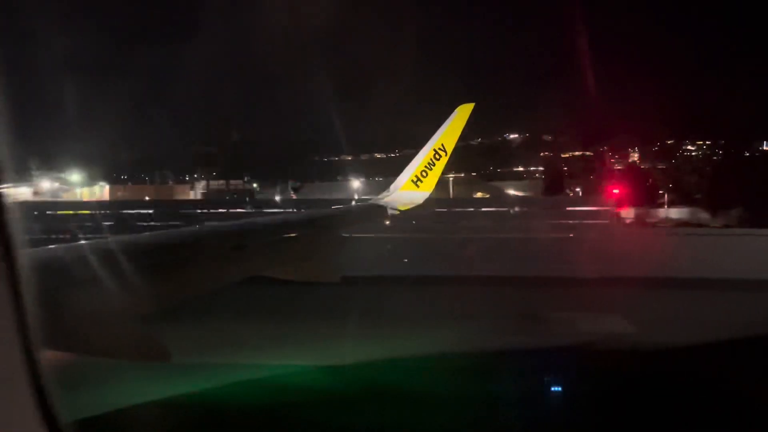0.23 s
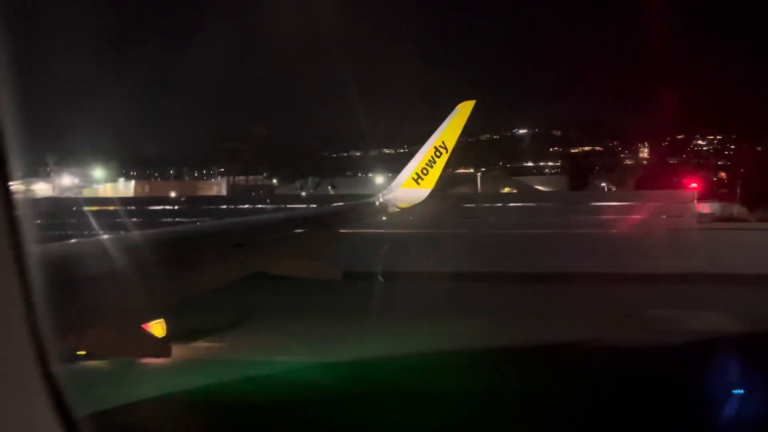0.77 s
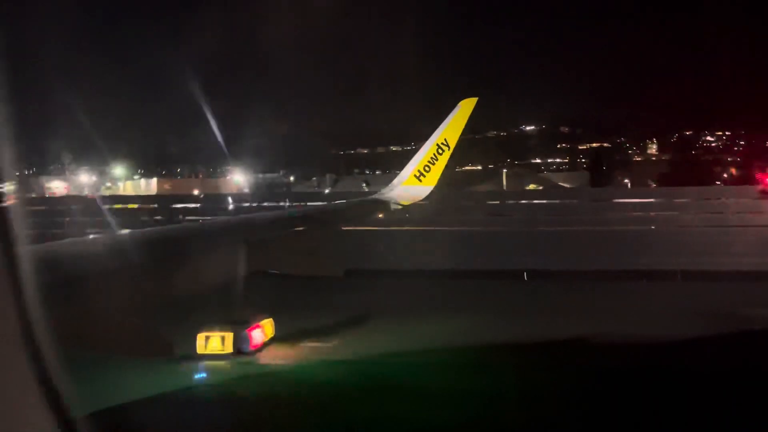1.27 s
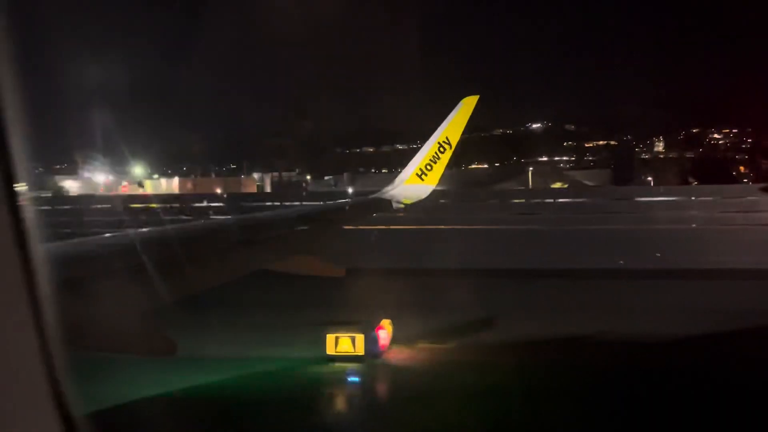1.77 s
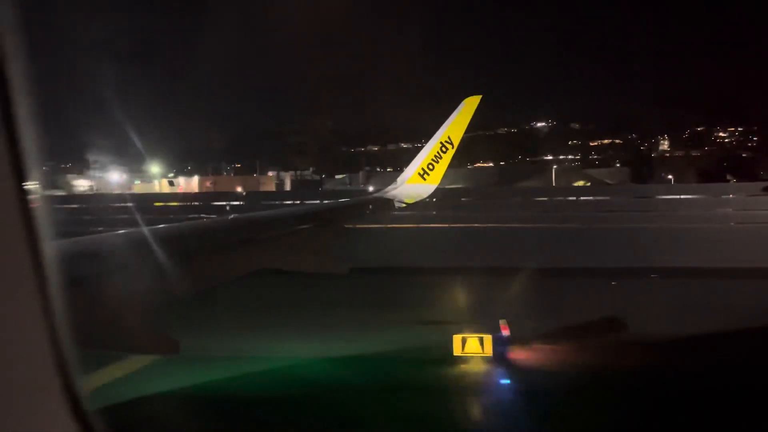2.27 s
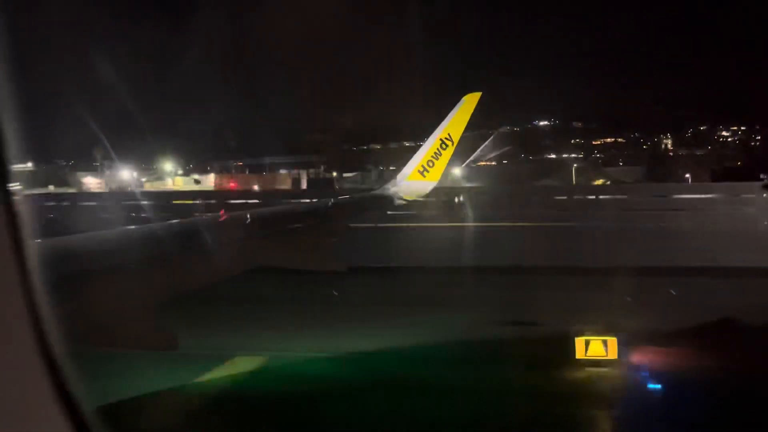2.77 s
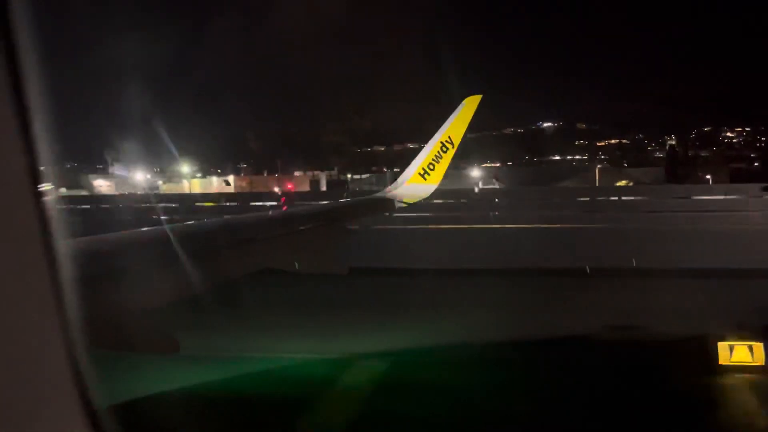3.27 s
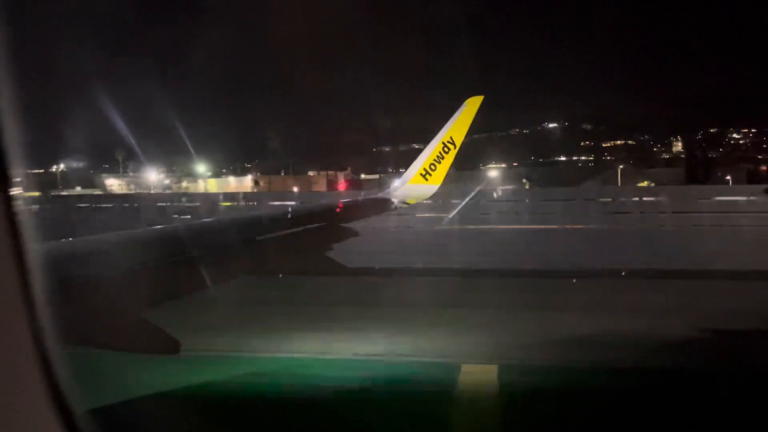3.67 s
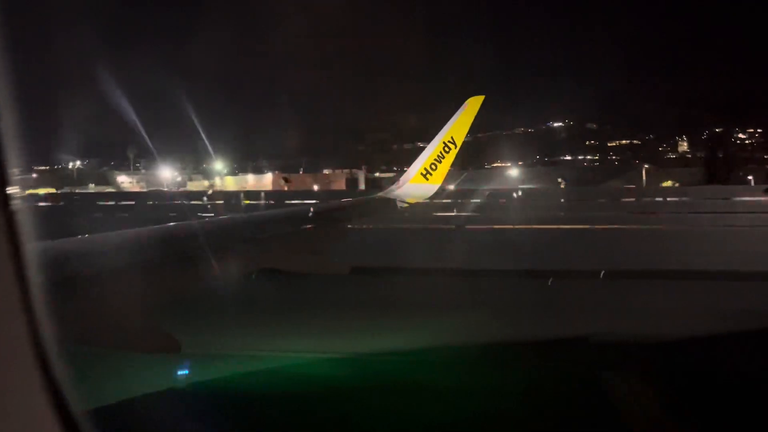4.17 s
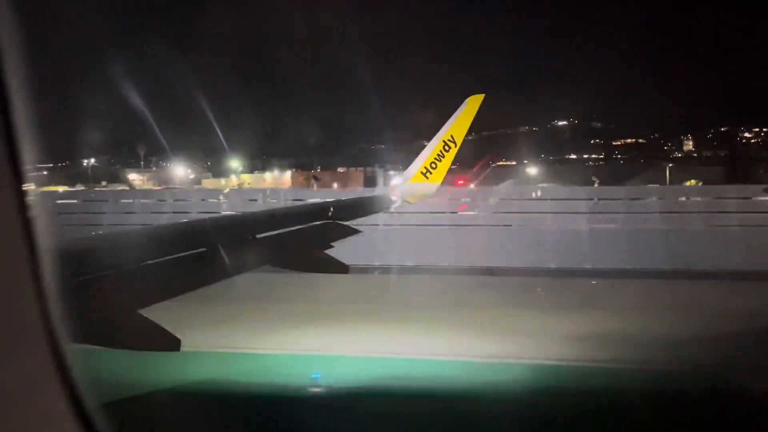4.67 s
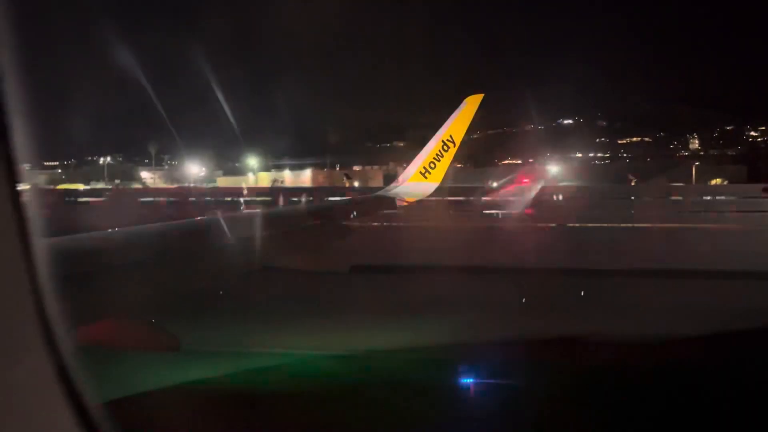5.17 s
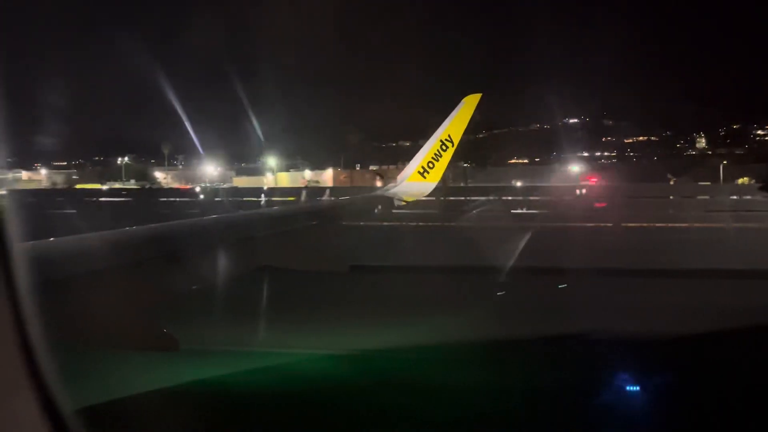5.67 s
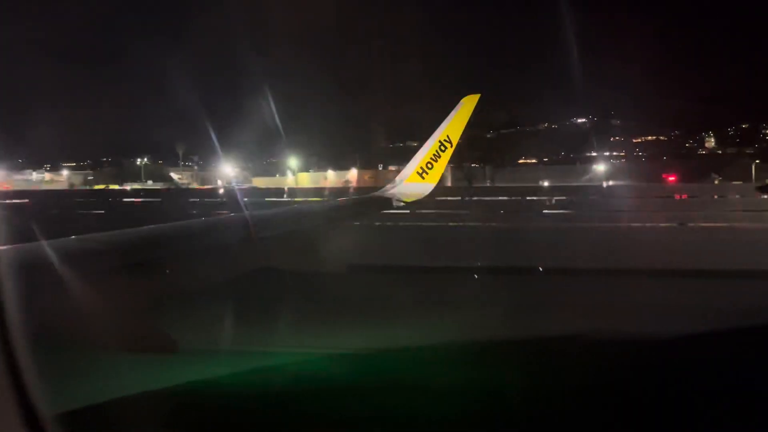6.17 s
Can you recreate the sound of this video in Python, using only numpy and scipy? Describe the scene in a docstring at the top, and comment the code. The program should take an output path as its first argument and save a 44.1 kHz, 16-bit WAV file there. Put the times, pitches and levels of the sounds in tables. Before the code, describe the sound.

For about six and a half seconds we are inside an airliner cabin as it taxis, with a stereo microphone by the window. From 0 s a very deep hull boom surges and drops unevenly as wheels cross slabs, strong at the start, near 0.5 s and 1 s, and heaviest around 1.3-1.7 s; further swells come near 2.7, 3.2, 3.5, 4.6, 5.4 and 5.9 s. A higher, fluttering thrum jolts alongside. Muffled engine roar, low rumble and faint vent hiss stay constant over a steady low hum. Two hydraulic pumps hold a nasal whine, beating about 1.8 times a second. Faint dry trim or cloth rustles begin near 0.5 s, cluster around 1.2-1.5 s, then recur sparsely around 2, 2.75, 3.6, 4.4 and 4.9 s, with a last faint one at 5.4 s. The bed continues to the end without stopping.

```python
"""Inside an airliner cabin while it taxis, a two-port microphone held by the window.
From the start the hull booms and thrums as the wheels roll over uneven slabs: near sines shaken in pitch and level.
Engines and air vents roar and hiss as shaped noise through the walls, with a steady low hum beneath.
Two hydraulic pumps, slightly out of step, whine and beat: harmonics and mixing tones one beat apart.
From half a second on, the trim or cloth rustles faintly now and then: short puffs of grainy band noise."""
import sys
import numpy as np
from scipy import signal
from scipy.fft import rfft, irfft
from scipy.io import wavfile
from scipy.ndimage import uniform_filter1d

SR = 44100
rng = np.random.default_rng(int(sys.argv[2]) if len(sys.argv) > 2 else 0)


def bounce(signal):
    """Save signal as a 16-bit WAV file at the path given by the first command-line argument."""
    frames = np.transpose(np.atleast_2d(signal))
    limited = np.clip(frames, -1, 1)
    pcm = np.round(limited * 32767).astype(np.int16)
    wavfile.write(sys.argv[1], SR, pcm)


N = 283116  # length in samples
LOW_CUT_HZ, EDGE_HZ = 23, 15750  # the microphone's bass cut and the upper band limit

# Stereo spread by frequency; the top treble is nearly alike in both channels, with shifted phase.
# Each row: frequency in Hz, likeness from 0 to 1, lead of the left channel in radians,
# excess of the left channel in dB.
STEREO_SPREAD = [(60, 0.97, 0, 1.5), (120, 1, 0, 1), (238, 0.99, 0.46, 0.5), (340, 0.71, 0.44, 5.5),
                 (487, 0.92, -0.3, 0.5), (643, .15, 1, -2.3), (830, 0.4, 2.5, 1.5), (1280, 0, 3.5, -1),
                 (1600, 0.7, 3.5, -3.5), (1760, 0.8, 7, 6), (2590, .55, 7, 2.5), (3650, 0.4, 7, 6.5),
                 (5030, 0.6, 6.5, 6), (7300, 0.3, 4.5, 1.5), (7740, 1, 2.5, -0.5), (8850, 1, 3, 0.5),
                 (9550, 0.7, 1.8, 0), (10700, 0.98, 1.16, 1), (13400, 0.96, -0.5, 0), (14000, .9, -2.5, 1),
                 (15200, 0.99, -3, 0.5)]


def gain_of(db):
    """Decibels to amplitude."""
    return 10 ** (np.asarray(db) / 20)


def evened(x):
    """Scales to unit rms."""
    return x / np.sqrt(np.mean(x ** 2) + 1e-20)


def read(points, hz):
    """Every column of a table at hz, on a log-frequency axis."""
    f, *columns = np.transpose(points)
    return [np.interp(np.log(hz + 1), np.log(f + 1), c) for c in columns]


def drift(rate):
    """Slow chance of unit rms: noise smoothed twice over 1 / rate seconds."""
    size = int(SR / rate)
    once = uniform_filter1d(rng.standard_normal(N), size)
    return evened(uniform_filter1d(once, size))


def tone(hz):
    """A sine of unit rms that follows a pitch curve from a random phase."""
    return np.sqrt(2) * np.sin(2 * np.pi * (np.cumsum(hz) / SR + rng.random()))


def fan_hum():
    """A steady hum, perhaps a duct fan: harmonics of one slightly drifting speed."""
    # Each row: harmonic number, level in dB before the port trim.
    fan_harmonics = [(1, -41), (4, -68.5)]
    speed_hz = 229.2 + .2 * drift(rate=0.88)
    return sum(gain_of(db) * tone(order * speed_hz) for order, db in fan_harmonics)


def rustles():
    """Trim or cloth rubs faintly: grainy band noise with a quick start and a bell-shaped fall."""
    # Each row: start in seconds, fall time in seconds, level in dB before the rise and fall,
    # centre in Hz, width in Hz before the band is held between 200 Hz and the upper limit.
    puff_list = [(0.476, .03, -68, 10200, 600), (1.2, 0.016, -51, 2280, 350),
                 (1.253, .012, -65, 9500, 7970), (1.3, 0.053, -74, 9800, 1500),
                 (1.367, 0.047, -59, 1700, 905), (1.451, 0.0094, -63, 13500, 3470),
                 (1.469, .004, -54, 7560, 6000), (1.474, 0.048, -76, 7960, 6000),
                 (1.51, 0.022, -49, 2100, 800), (1.949, 0.059, -75, 7500, 2980),
                 (2.057, 0.039, -51.5, 2009, 904), (2.519, 0.032, -72.5, 8910, 4000),
                 (2.752, 0.026, -51, 1893, 900), (2.869, 0.037, -76, 10970, 3000),
                 (3.225, 0.065, -74, 11130, 3000), (3.576, 0.037, -55.5, 2111, 892.6),
                 (3.597, 0.033, -70, 10760, 4000), (3.72, 0.048, -75, 5990, 3000),
                 (4.415, 0.04, -65.5, 8900, 5970), (4.467, 0.15, -74, 9146, 6986),
                 (4.923, 0.033, -54, 1793, 1001), (5.4, .05, -74, 11000, 2992)]
    left = np.zeros(N)
    for start_s, length_s, db, hz, width in puff_list:
        t = np.arange(0, 2 * length_s, 1 / SR)
        grain = rng.standard_normal((N // 20, 2))[:len(t)].prod(1)  # a product of two noises is spikier
        band = [max(hz - width / 2, 200), min(hz + width / 2, EDGE_HZ)]
        band_pass = signal.butter(2, band, "bandpass", fs=SR, output="sos")
        puff = evened(signal.sosfilt(band_pass, grain))
        envelope = np.minimum(t / 0.0024, 1) * np.exp(-(t / length_s) ** 2)
        left[round(start_s * SR):][:len(t)] += gain_of(db) * puff * envelope
    lead = read(STEREO_SPREAD, np.fft.rfftfreq(N, 1 / SR))[1]
    right = irfft(rfft(left) * np.exp(-1j * lead), N)  # the same puffs, shifted in phase
    return np.array([left, right])


def cabin_noise(patchy_db=0.57, treble_db=1.0, standing_db=0.48, surge_db=0.8):
    """Rumble, roar and hiss as random short-time spectra; the right is partly a shifted left."""
    # Broad noise: rolling rumble, engine roar through the wall, air-vent hiss.
    # Each row: frequency in Hz, level in dB per Hz (mean power of the channels) before the unevenness.
    rumble = [(18, -66), (28, -52.5), (38, -45), (46, -37.5), (54, -44.5), (64, -40), (72, -41),
              (80, -47.5), (92, -48.5), (110, -45.5), (145, -49), (165, -45), (192, -46), (205, -49.5),
              (220, -53), (238, -54.5), (248, -53), (260, -56.5), (300, -59)]
    roar = [(348, -53.5), (395, -55.5), (430, -61), (475, -57.5), (495, -57.5), (515, -56), (540, -57),
            (558, -59.5), (575, -64.5), (610, -68), (660, -70), (705, -69.5), (800, -73), (880, -75.5),
                   (940, -73), (1000, -77.5), (1070, -78), (1150, -75.5), (1230, -79.5), (1300, -83.5),
            (1370, -83.5), (1450, -79), (1510, -80.5), (1570, -78.5), (1635, -82), (1670, -84.5)]
    hiss = [(1900, -84), (2090, -85), (2200, -84), (2490, -88.5), (2570, -86), (2730, -91.5), (2900, -89.5),
            (3050, -91), (3220, -90), (3380, -92.5), (4000, -92), (4600, -94), (5100, -99.5), (6500, -103),
            (8000, -107), (10000, -109), (12000, -112), (14000, -116.5), (15600, -121)]
    size, hop = 4096, 1024  # samples
    frames, hz = N // hop + 5, np.fft.rfftfreq(size, 1 / SR)
    a, b, c, d, patches, surges = rng.standard_normal((frames, len(hz), 6)).T
    # rows are frequency, columns are time
    surges = uniform_filter1d(surges, size=200, axis=0)
    surges = evened(uniform_filter1d(surges, size=2, axis=1))
    patches = uniform_filter1d(patches, size=40, axis=0)
    patches = evened(uniform_filter1d(patches, size=2, axis=1))

    same, lead, balance_db = (v[:, None] for v in read(STEREO_SPREAD, hz))
    same = np.clip(same, 0, 1)
    left = a + 1j * b
    right = same * left + np.sqrt(1 - same ** 2) * (c + 1j * d)
    right = right * np.exp(-1j * lead)
    share = np.sqrt(1 / (1 + gain_of(-2 * balance_db)))  # the two channels split the power
    spectra = np.array([left * share, right * np.sqrt(1 - share ** 2)])

    # standing waves make narrow fixed peaks and dips
    standing = evened(uniform_filter1d(rng.standard_normal((len(hz), 1)), size=3, axis=0))
    spectra *= gain_of(standing_db * standing * (hz > 250)[:, None])
    level_db = read([*rumble, *roar, *hiss], hz)[0][:, None]
    flicker_db = patchy_db + treble_db * np.clip(hz / 9000, 0, 1)[:, None]  # the treble flickers more
    vent_db = surge_db * surges * (hz > 900)[:, None]  # the vent air surges unevenly over wide bands
    spectra *= gain_of(level_db + flicker_db * patches + vent_db)
    noise = signal.istft(spectra, SR, nperseg=size, noverlap=size - hop, scaling="psd")[1][:, :N]
    return np.sqrt(2) * noise * gain_of(.25 * drift(rate=1.7))


def pumps(wander_turns=.015, slow_db=1.0, fast_db=1.4):
    """Pressure ripple: tones one beat apart line up once a beat, so harmonics swell and fade."""
    # Both pumps and their mixing tones. Each row: harmonic number, beats above it,
    # left and right level in dB before the random unevenness.
    ripple = [(1, 0, -38, -41), (1, 1, -34, -43), (1, 2, -55, -60), (2, -1, -70, -67), (2, 0, -60, -73),
              (2, 1, -72, -60), (2, 2, -66, -57), (3, -1, -68, -70), (3, 0, -63, -64), (3, 1, -66, -68),
              (3, 2, -68, -77), (3, 3, -66, -67), (4, -1, -81, -76), (4, 0, -72, -72), (4, 1, -82, -71),
              (4, 2, -75, -79), (4, 3, -84, -72), (4, 4, -77, -73), (5, -1, -74, -79), (5, 0, -76, -77),
              (5, 1, -72, -77), (5, 2, -70, -75), (5, 4, -76, -84), (5, 6, -79, -86), (6, -1, -76, -89),
              (6, 1, -78, -81), (6, 2, -75, -93), (6, 3, -81, -95), (6, 5, -81, -92), (7, -1, -86, -87),
              (7, 1, -83, -87), (7, 2, -87, -87), (7, 4, -87, -88)]
    # One row a harmonic: first swell of the beat in seconds at the left port, then at the right,
    # lead of the left port in radians, lag in turns of the overtones nearer the faster pump.
    swell = [(.35, .48, .3, 0), (.26, .3, .4, -.13), (.39, .39, 1.2, .3), (.49, .47, -1.85, .09),
             (.48, .48, 1.15, .13), (.3, .51, -1.5, -.19), (.33, .33, .8, 0)]
    pump_hz, beat_hz = 364.795, 1.809  # the slower pump, and how much faster the other runs
    t, out = np.arange(N) / SR, np.zeros((2, N))
    for order, beats, *db in ripple:
        *swell_s, lead, lag = swell[order - 1]
        since = t - np.array(swell_s)[:, None]
        turns = order * pump_hz * t + beats * beat_hz * since + wander_turns * drift(rate=4.2)
        turns -= lag * (beats > order / 2)  # the lag spreads the line-up, so swells last
        # a modest random unevenness in level, drawn separately for each tone
        unevenness = gain_of(slow_db * drift(rate=7.6) + fast_db * np.tanh(drift(rate=33)))
        wave = np.cos(2 * np.pi * turns - np.array([[0], [lead]]))
        out += np.sqrt(2) * gain_of(db)[:, None] * unevenness * wave
    return out


def hull_mode(level_db, hz, wobble, sway, flutter_db, flutter_rate):
    """One hull mode: a near sine whose pitch (by fractions) and level are jostled by the ground."""
    pitch = hz * (1 + wobble * drift(rate=23.4) + sway * drift(rate=4.86))
    flutter = gain_of(flutter_db * np.tanh(drift(rate=flutter_rate)))
    return gain_of(level_db) * evened(flutter) * tone(pitch)


def hull():
    """The ground shakes the two lowest hull modes: a boom of moving pitch and a higher thrum."""
    # Each row: time in seconds, boom pitch in Hz before the jostling,
    # boom and thrum level in dB before flutter and port trim.
    shake = [(0.0, 56, -12, -32), (0.05, 54.2, -15.5, -32), (0.27, 58.7, -30, -34),
             (0.36, 54.2, -25.5, -30), (0.55, 54.8, -13, -33), (0.77, 50.5, -21, -32),
             (0.82, 50.76, -19, -17), (0.88, 51.07, -24.5, -27), (0.98, 51.7, -13, -39),
             (1.07, 53.2, -25.5, -27), (1.14, 56.83, -27, -37), (1.21, 57.4, -16.5, -23.5),
             (1.32, 54.4, -12, -20.5), (1.43, 54.65, -10.5, -26), (1.54, 57.2, -27, -25),
             (1.66, 54.33, -10.5, -28), (1.97, 54.26, -24.5, -33.5), (2.16, 52.8, -20.5, -26),
             (2.22, 54.55, -18, -27), (2.29, 58.66, -23.5, -50), (2.41, 58.64, -23, -19),
             (2.45, 58.1, -25, -32), (2.63, 53.04, -17, -35), (2.84, 53.3, -15, -31),
             (2.88, 53, -29, -28.5), (2.95, 54.66, -31, -33), (3.16, 54.52, -13, -17.5),
             (3.33, 54.54, -22.5, -40), (3.38, 54.7, -20.5, -19), (3.45, 54.13, -13, -35),
             (3.84, 55.75, -20.5, -33), (3.92, 52.4, -23, -41), (3.99, 51.66, -18.5, -26.5),
             (4.11, 55.23, -22, -33), (4.17, 53.7, -29, -21.5), (4.24, 53.0, -15, -30),
             (4.34, 53.2, -29, -26), (4.42, 53.2, -22, -46), (4.47, 53.6, -17.5, -29.5),
             (4.65, 53, -14, -26.5), (4.68, 52.9, -28.5, -31), (4.85, 53.1, -20, -25),
             (4.92, 55.5, -29, -25.5), (4.97, 57.2, -20, -41), (5.04, 56.5, -33, -30),
             (5.09, 54.1, -26, -27), (5.24, 54.7, -19.5, -39), (5.38, 53.1, -20, -19.5),
             (5.43, 55.1, -14.5, -20), (5.52, 55.8, -31, -26.5), (5.61, 56.37, -24, -39),
             (5.69, 57.37, -29.5, -25.5), (5.81, 57.3, -19, -27), (5.88, 57.3, -13, -43),
             (5.92, 57.22, -16, -29), (6.02, 56.7, -16, -24), (6.08, 54.43, -28, -32),
             (6.11, 54.43, -17, -20.5), (6.26, 57.5, -21.5, -34), (6.42, 57.0, -18, -23.5)]
    s, *columns = np.transpose(shake)
    boom_hz, boom_db, thrum_db = (np.interp(np.arange(N) / SR, s, c) for c in columns)
    boom = hull_mode(boom_db, boom_hz, wobble=0.027, sway=0.0049, flutter_db=2.5, flutter_rate=27)
    thrum = hull_mode(thrum_db, 79.55, wobble=0.036, sway=0.015, flutter_db=4.5, flutter_rate=54)
    return boom + thrum


def scene():
    """Hull and fan hum reach both ports in step, the right a little weaker; the rest is two-port."""
    port_trim = gain_of([[-.3], [-1.8]])  # left, right
    return (hull() + fan_hum()) * port_trim + cabin_noise() + pumps() + rustles()


def record(dry):
    """The microphone drops the deepest bass; then the band limit."""
    bass_cut = signal.butter(2, LOW_CUT_HZ, "highpass", fs=SR, output="sos")
    thinned = signal.sosfilt(bass_cut, dry)
    band_limit = signal.firwin(511, EDGE_HZ, window=("kaiser", 9), fs=SR)
    return signal.oaconvolve(thinned, band_limit[None], "same")


dry = scene()
out = record(dry)
bounce(out)
```